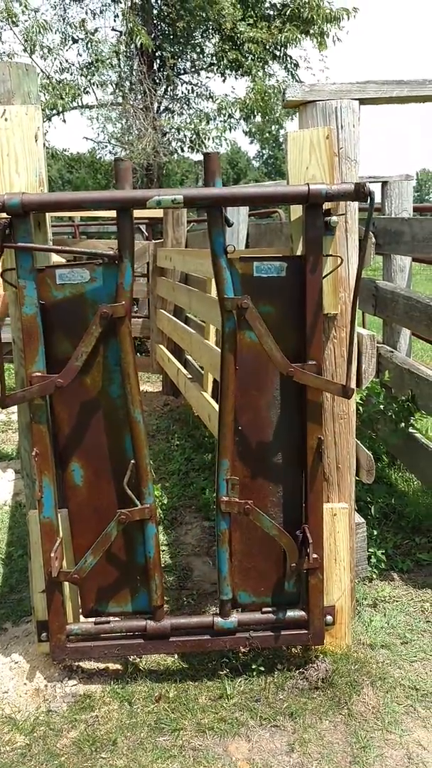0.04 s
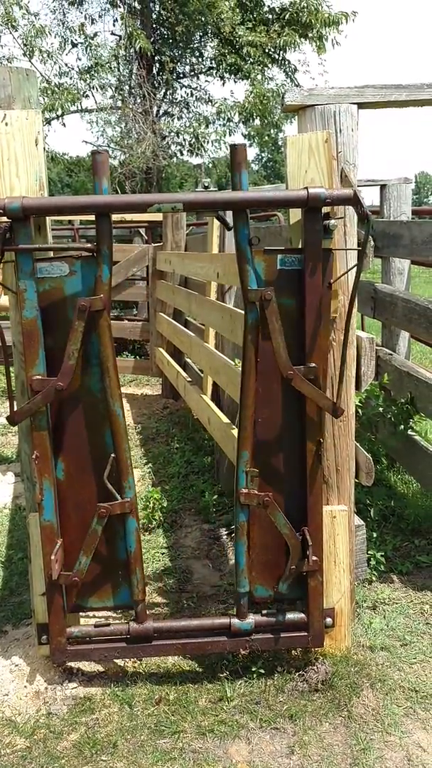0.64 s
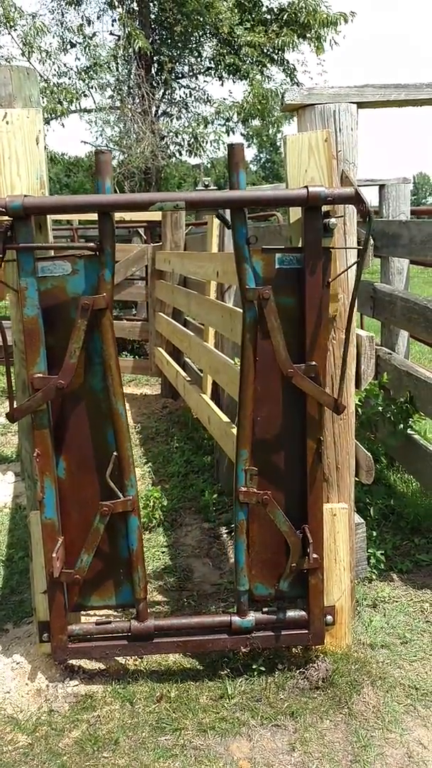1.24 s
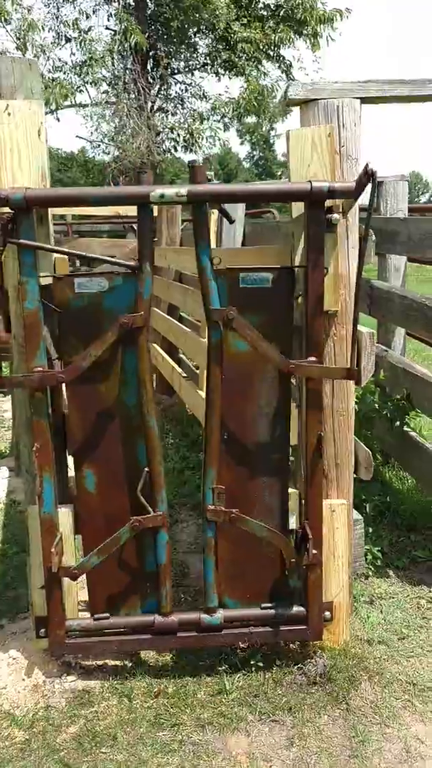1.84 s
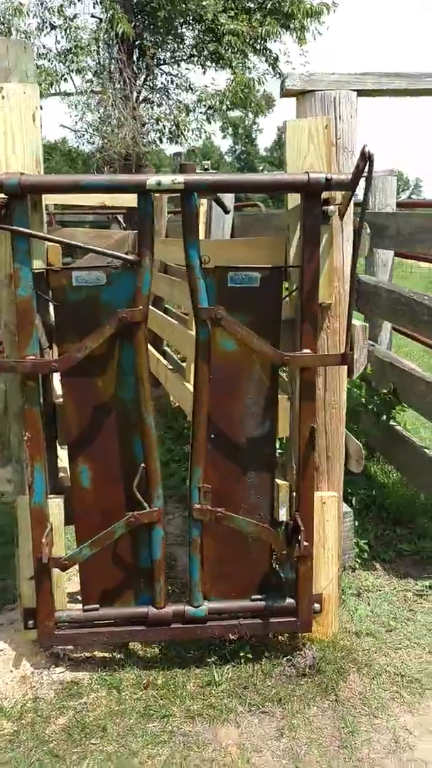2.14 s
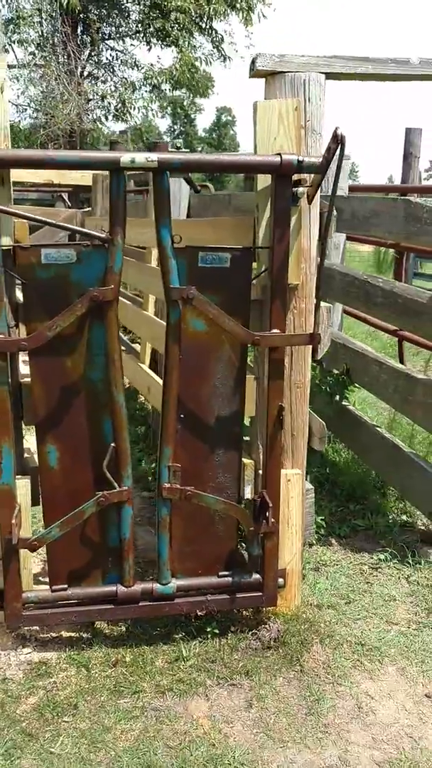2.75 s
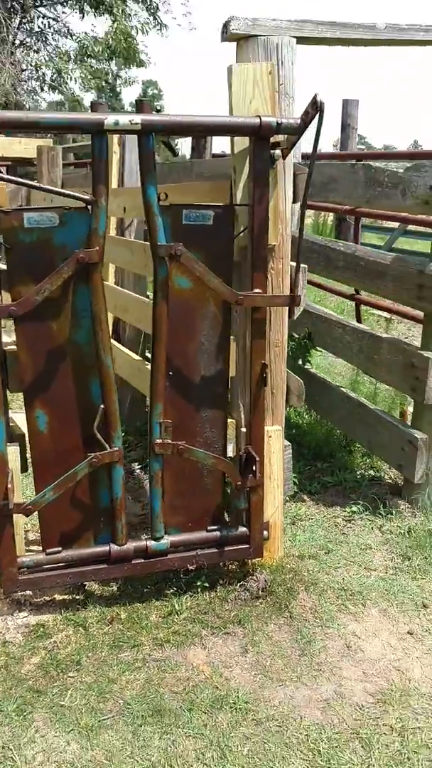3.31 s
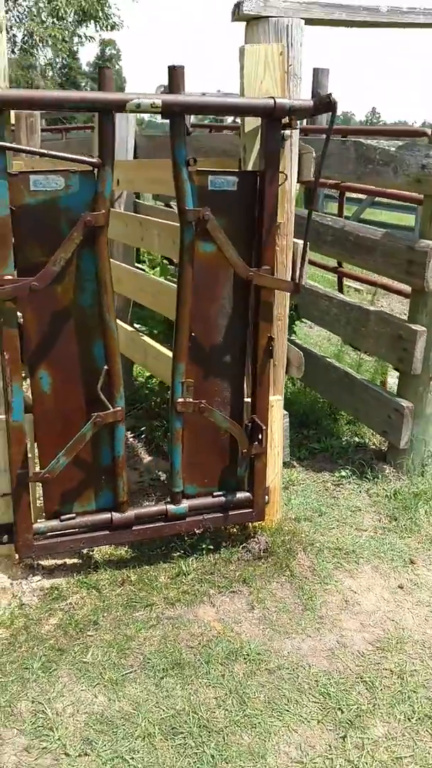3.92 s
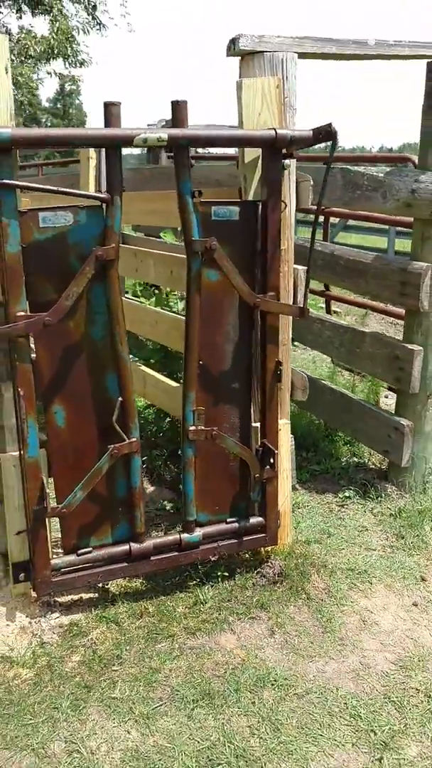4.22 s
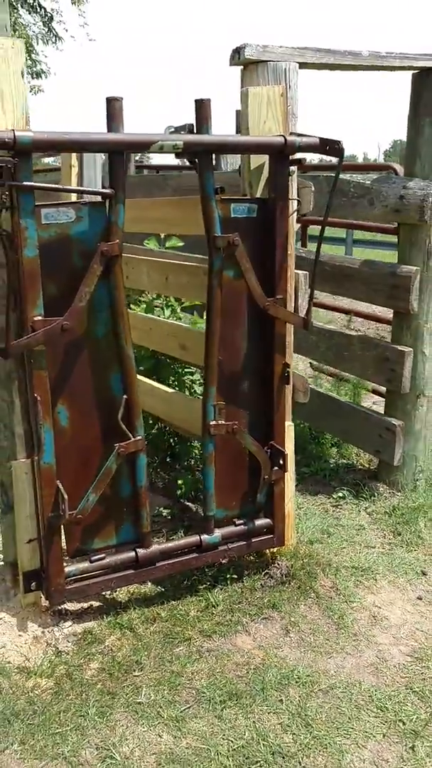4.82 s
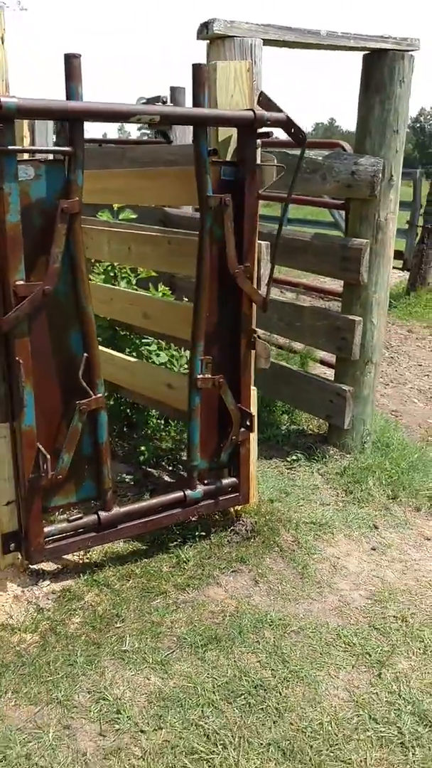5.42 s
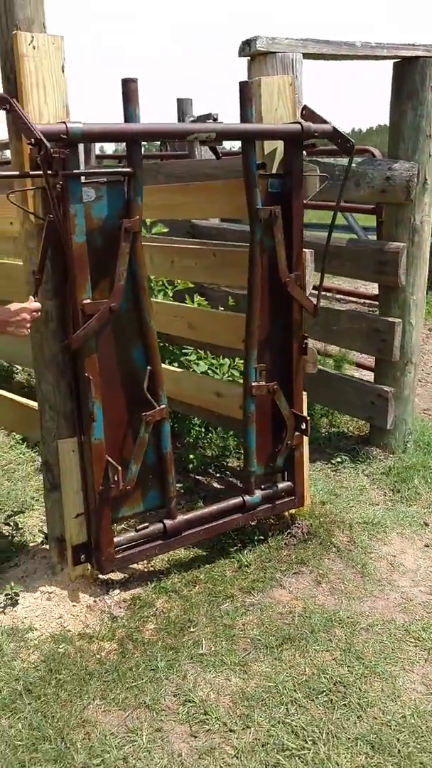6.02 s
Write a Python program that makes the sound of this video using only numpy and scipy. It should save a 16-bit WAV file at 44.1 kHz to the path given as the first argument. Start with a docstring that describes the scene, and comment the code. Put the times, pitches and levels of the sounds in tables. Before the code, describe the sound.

Metal gate panels shudder and scrape along a pipe while loose links clatter, with dull bumps and a short pivot squeal.

```python
"""Outdoors, a rusty steel head gate on a cattle chute is levered open and shut twice.
From the start its two panels shudder and scrape along a pipe, loose links clack, and the sheet steel
rings and groans. A faint whine follows, and someone begins shifting about in the grass. After the second
stroke come soft dull bumps; two more strokes clatter by, a dry pivot squeals at 4.3 s, and a last stroke
ends in clacks, groans and fading bumps. It is all heard through a stereo widener with a comb ripple."""
import sys
import numpy as np
from scipy import signal
from scipy.fft import rfft, irfft
from scipy.io import wavfile
from scipy.ndimage import uniform_filter1d

SR = 44100
rng = np.random.default_rng(int(sys.argv[2]) if len(sys.argv) > 2 else 0)


def file_out(sig):
    """Save sig as 16-bit WAV at sys.argv[1]."""
    # one column per channel
    cols = np.atleast_2d(sig).T
    # limit, then scale
    lim = np.clip(cols, -1, 1)
    pcm = np.round(lim * 32767).astype(np.int16)
    wavfile.write(sys.argv[1], SR, pcm)


N = 267246
T = np.arange(N) / SR


def amp(db):
    """Decibels to gain."""
    return 10 ** (np.asarray(db) / 20)


def unit(x):
    """Scales to rms 1."""
    return x / np.sqrt(np.mean(x ** 2) + 1e-20)


def read(points, hz):
    """Reads a table on a log-frequency axis."""
    f, value = np.transpose(points)
    return np.interp(np.log(hz + 1), np.log(f + 1), value)


def bins(x):
    """Frequencies of the spectrum of x."""
    return np.fft.rfftfreq(len(x), 1 / SR)


def colour(x, points):
    """Puts x through an EQ curve, at rms 1."""
    return unit(irfft(rfft(x) * amp(read(points, bins(x))), len(x)))


def drift(hz, size=N):
    """Random wobble of rms 1, up to about hz."""
    x = rng.standard_normal(size)
    return unit(irfft(rfft(x) * np.exp(-(bins(x) / hz) ** 2), size))


def add(mix, s, sound):
    """Mixes a sound in at s seconds."""
    part = mix[max(round(s * SR), 0):][:len(sound)]
    part += sound[:len(part)]


def away(peak, before, after):
    """Distance from a peak in time: 0 at the peak, 1 at the given spans before and after it."""
    return np.maximum((peak - T) / before, (T - peak) / after)


def tone(curve, partials, waver, shake_db):
    """A gliding, slightly rough tone from rows (s, Hz, dB) and partials (harmonic, dB)."""
    s, hz, db = np.transpose(curve)
    turns = np.cumsum(np.interp(T, s, hz) * (1 + waver * drift(61))) / SR
    level = amp(np.interp(T, s, db) + shake_db * drift(130)) * (T > s[0]) * (T < s[-1])
    wave = sum(amp(part_db) * np.sin(2 * np.pi * k * turns) for k, part_db in partials)
    return np.sqrt(2) * level * wave


# EQ of the outdoor bed. Each row: frequency in Hz, relative level in dB.
AIR_EQ = [(25,8),(100,0.5),(250,8.5),(600,-25),(1480,-19),(1620,10),(1800,-30),(3000,-39),(4200,-14),(7000,-40),(9500,-12.5),(12000,-38),(15000,-27)]
def outdoor_air(level_db=-55):
    """A soft bed of air that slowly swells and sinks."""
    return colour(rng.standard_normal(N), AIR_EQ) * amp(level_db + 3.9 * drift(1.8))


# Panel shudders. Each row: peak time, build-up and die-away in seconds, relative level in dB.
PANEL_SHUDDERS = [(0,.05,0.1,-33),(.34,0.23,0.21,-18.5),(.77,0.15,0.11,-39.5),(1.42,0.26,0.071,-20.5),(1.78,0.067,0.13,-25),(2.15,0.37,.36,-28),(3.178,0.09,0.11,-22.5),
                  (3.39,0.21,0.36,-26.5),(3.65,.2,0.28,-25.5),(4.09,0.26,0.052,-28),(4.27,0.067,0.26,-23.5),(5.32,0.3,0.066,-16.5),(5.78,0.5,0.24,-37.5)]
def shuddering(swing_db=20):
    """Envelope of panels binding or brought up short; each build-up and die-away spans swing_db."""
    return np.sqrt(sum(amp(db - swing_db * away(*swell)) ** 2 for *swell, db in PANEL_SHUDDERS))


# Lever strokes. Each row: time of top speed, speed-up and slow-down in seconds, relative level in dB.
LEVER_STROKES = [(.32,0.32,0.28,-18.5),(1.6,.5,0.44,-20.5),(3.61,0.34,0.099,-17.5),(4.3,0.16,0.34,-26.5),(5.37,0.58,0.13,-21)]
def sliding(speed_power=2.13):
    """Envelope of friction on the pipe: it follows the speed, one arch from rest to rest per stroke."""
    return sum(amp(db) * np.cos(np.pi / 2 * np.minimum(away(*arch), 1)) ** speed_power
               for *arch, db in LEVER_STROKES)


# EQ of rubbed steel. Each row: frequency in Hz, relative level in dB.
SCRAPE_EQ = [(40,-32),(100,-23.5),(165,1),(245,4),(340,-3),(550,3),(1050,1.5),(1700,-3.5),(3000,-6),(4200,-11),(5900,-15.5),(7200,-22.5),(12000,-28.5),(15000,-40.5)]
def scrape(level_db=-2, slips_per_s=900, spread_db=3.5, slip_ring_s=0.0064, hiss=0.83,
           judder_db=-0.94, judder_hz=60, crossover_hz=2800):
    """Rust catches and slips in tiny ringing jolts; sliding drives mostly grit, shuddering mostly body."""
    jolts = amp(spread_db * np.minimum(rng.exponential(1, N), 4)) * (rng.random(N) < slips_per_s / SR)
    # every spot of rust has its own short ring
    rings = rng.standard_normal((12, 1024)) * np.exp(-T[:1024] / slip_ring_s)
    spot = rng.integers(0, len(rings), N)
    slips = sum(signal.oaconvolve(jolts * (spot == k), ring)[:N] for k, ring in enumerate(rings))
    friction = unit(slips) + hiss * rng.standard_normal(N)
    rub = colour(friction * amp(judder_db * drift(judder_hz)), SCRAPE_EQ)
    treble = irfft(rfft(rub) / (1 + (crossover_hz / (bins(rub) + 1)) ** 4), N)
    slide, shudder = sliding(), shuddering()
    # both envelopes have a floor: the loose panels never quite keep still
    body = np.sqrt(shudder ** 2 + (amp(-10) * slide) ** 2 + amp(-56.5) ** 2)
    grit = np.sqrt(slide ** 2 + (amp(-12) * shudder) ** 2 + amp(-48.5) ** 2)
    return amp(level_db) * (body * (rub - treble) + grit * treble)


# Steel hits. Each row: start in seconds, strength in dB, hardness in dB, rattle time in seconds.
LINK_HITS = [(.057,-19,2.5,0.11),(.228,-31,-8.5,0.13),(.397,-23,-8,0.39),(0.444,-20.5,5,0.067),(.507,-24,-4.5,0.13),(.914,-25,-8.5,.14),(1.096,-27.5,-22.5,.1),
             (1.358,-30.5,18.5,0.14),(1.389,-23,-14,0.28),(1.436,-21.5,-4,0.15),(1.627,-25.5,-8,0.24),(1.68,-21.5,6.5,0.19),(1.723,-24.5,4,0.1),(1.741,-20,-1.5,0.79),
             (1.924,-22.5,2.5,0.22),(2.03,-24.5,-0.5,0.38),(2.051,-23,1,0.24),(2.086,-24,0,0.36),(2.154,-26.5,4,0.26),(2.187,-27.5,-2.5,0.37),
             (3.176,-21,9,0.24),(3.29,-31,-13.5,0.25),(3.346,-28,-12,0.076),(3.48,-26,-8,0.077),(3.501,-24,7.5,0.35),(3.552,-21.5,2.5,0.32),(3.635,-16.5,2.5,0.37),(3.709,-23.5,12.5,0.17),
             (3.803,-26.5,0.5,0.18),(3.925,-36,8,0.21),(3.941,-20.5,-1.5,0.094),(4.02,-23.5,-2,0.14),(4.214,-25.5,-8,0.07),(4.233,-19,6.5,0.22),(4.329,-22.5,13,0.074),
             (4.883,-21,-1,0.15),(4.992,-48,27.5,0.21),(5.027,-29.5,-21,0.15),(5.033,-21,10,0.12),(5.337,-18,1,0.42),(5.409,-18.5,9,0.13),(5.484,-37,-12,0.091),(5.565,-39.5,-7.5,0.38),(5.648,-28,-5,0.17)]
# EQ of struck steel. Each row: frequency in Hz, relative level in dB.
HIT_EQ = [(40,-48),(100,-18),(170,-7),(245,3),(340,-8),(550,1.5),(1000,5.5),(1700,5),(2450,2),(3000,-13),(4200,-14.5),(7000,-34),(12000,-47.5),(15000,-67)]
# A hit's four bands: thud, clang, clink, tick. Each row: trim in dB, dB gained per dB of hardness.
HIT_BANDS = [(-5.5,-0.5345),(-1,0),(-5,0.5277),(-26.5,1.0)]
# The three crossovers between those bands, in Hz.
HIT_CROSSOVERS = [850, 2800, 7500]
def knocks(level_db=3, chatter_db=0.5, rise_s=0.0012, damping=0.098, crack=0.16, crack_s=0.0034):
    """Loose links clack in chattering bursts; hard hits favour the highs, which crack and die first."""
    out, t = np.zeros(N), T[:16384]
    hz = bins(t)
    band = np.searchsorted(HIT_CROSSOVERS, hz)
    for s, strength_db, hardness_db, rattle_s in LINK_HITS:
        spectrum = rfft(rng.standard_normal(len(t))) * amp(read(HIT_EQ, hz))
        chatter = amp(chatter_db * drift(430, size=len(t)))
        for k, (trim_db, slope) in enumerate(HIT_BANDS):
            attack = (1 - np.exp(-t * (1 + k) ** 2 / rise_s)) * (1 + crack * k * np.exp(-t / crack_s))
            fall = amp(-60 * t * (1 + damping * k) / rattle_s)
            burst = unit(irfft(spectrum * (band == k)) * chatter * attack * fall) * np.std(fall)
            add(out, s, amp(strength_db + trim_db + slope * hardness_db + level_db) * burst)
    return out


def moving_contact(force, patchy_db=3):
    """The point of contact moves, favouring now one cluster of resonances and now another."""
    hz, _, frames = signal.stft(force, SR, nperseg=512, noverlap=384)
    slow_noise = uniform_filter1d(rng.standard_normal(frames.shape), size=16, axis=1)
    patches = unit(uniform_filter1d(slow_noise, size=2, axis=0))
    depth_db = patchy_db * np.minimum(hz / 1500, 1)[:, None]  # short waves feel the move most
    shifting = signal.istft(frames * amp(depth_db * patches), SR, nperseg=512, noverlap=384)[1][:N]
    return np.std(force) * unit(shifting)


# Tail of the dense wash of weak modes. Each row: frequency in Hz, 60 dB decay in seconds.
WASH_DECAY = [(100,0.97),(260,0.44),(700,0.37),(1800,0.27),(4800,0.17),(12000,0.22)]
# Clear modes of panels and frame. Each row: pitch in Hz, relative weight in dB, 60 dB decay in seconds.
STEEL_MODES = [(252,-22,0.2),(432,-5.5,3.8),(461,-11.5,2.4),(515,-1,0.37),(544.7,0,0.31),(583.5,1,0.28),(660.5,-0.5,0.24),(718,0,1.18),(797,-9,2.5),(924,-12,1.4),(1004,-2,0.5),(1049,-1,0.63),(1145,-12.5,2.8),(1258,-12.5,1.8),(1317,-0.5,0.8),(1404,-5.5,1.2),(1610,-7,2.65),(1675,0.5,0.33),(1750,-6,0.5),(2140,1,0.5),(2340,6,0.27),(3090,1,0.62),(3550,0,0.44),(4150,1,0.28)]
def steel_ring(force, wash_db=-8, modes_db=-9):
    """The sheet steel answers at once, then rings on with a wash of weak modes and some clear ones."""
    t = T[:2 * SR]
    hz, times, frames = signal.stft(rng.standard_normal(len(t)), SR, nperseg=256)
    decay = amp(-60 * times / read(WASH_DECAY, hz)[:, None])
    wash = signal.istft(frames * decay, SR, nperseg=256)[1][:len(t)]
    clear = sum(amp(db - 60 * t / t60) / np.sqrt(t60) * np.cos(2 * np.pi * f * t)
                for f, db, t60 in STEEL_MODES)
    wash_ring = amp(wash_db) * unit(signal.fftconvolve(force, wash)[:N])
    clear_ring = amp(modes_db) * unit(signal.fftconvolve(force, clear)[:N])
    return force + np.std(force) * (wash_ring + clear_ring)


# Groans and chirps. Each row: start, attack, hold and 60 dB release in seconds, pitch in Hz,
# level in dB, pitch wobble in Hz.
FRICTION_NOTES = [(.22,0.12,0.077,0.18,545,-23,7.5),(0.505,0.0036,0.0071,0.19,1074,-20.5,22),(1.677,0.0059,0.0094,0.057,5870,-21.5,170),(3.495,0.0065,0.042,.1,4520,-27,130),(3.975,0.012,0.021,0.11,1072,-29.5,44),(4.236,0.0049,0.018,0.089,4480,-25,56),(4.882,0.0016,0.014,0.17,587,-24.5,6.3),(5.263,0.053,0.053,0.29,678,-18,27.4)]
def groans(shake_db=3.5):
    """Stick and slip locks on to one resonance, which swells, wavers and dies."""
    out, t = np.zeros(N), T[:32768]
    for s, attack, hold, t60, hz, db, wobble_hz in FRICTION_NOTES:
        level = np.minimum(t / attack, 1) * amp(db - 60 * np.maximum(t - attack - hold, 0) / t60)
        turns = np.cumsum(hz + wobble_hz * drift(51, size=len(t))) / SR
        shake = amp(shake_db * drift(59, size=len(t)))
        add(out, s, level * shake * np.sin(2 * np.pi * turns))
    return out


# Glide of the whine. Each row: time in seconds, unsounded fundamental in Hz, relative level in dB.
WHINE_GLIDE = [(.6,296,-84.5),(.69,310,-57),(.74,323,-43),(.81,333,-56),(1.0,333,-47),(1.05,327,-53),(1.1,314,-43)]
def whine():
    """A faint, thin whine of two upper harmonics while the panels stand open."""
    return tone(WHINE_GLIDE, [(5, -4), (6, -3)], waver=0.002, shake_db=1.0)


# Foot moves. Each row: peak time in seconds, half length in seconds, level in dB.
FOOT_MOVES = [(0.852,0.034,-40.5),(1.187,0.16,-45),(2.531,0.079,-47.5),(2.88,0.91,-50),(4.519,0.13,-44.5),(4.83,0.12,-50.5)]
# EQ of the swish. Each row: frequency in Hz, relative level in dB.
GRASS_EQ = [(300,5),(2000,16),(4000,10),(9000,1.5),(15000,-5.5)]
def footsteps(crackle_db=2.0):
    """Grass swishes underfoot in smooth swells of crackly noise."""
    tread = sum(amp(db) * np.exp(-((T - s) / half) ** 2) for s, half, db in FOOT_MOVES)
    return tread * colour(rng.standard_normal(N) * amp(crackle_db * drift(500)), GRASS_EQ)


# Bump cues. Each row: start in seconds, relative level in dB.
BUMP_CUES = [(2.423,-25.5),(2.484,-28),(2.757,-31.5),(2.821,-32),(2.862,-37.5),(2.942,-35.5),(3.086,-27.5),(4.639,-37),(4.689,-30),(5.844,-29.5),(5.952,-38.5),(6.03,-47)]
# EQ of a bump. Each row: frequency in Hz, relative level in dB.
BUMP_EQ = [(50,-26),(130,-2),(340,-1.5),(600,-11),(1400,-13.5),(2500,-21),(8000,-51)]
def bumps(level_db=-3, rise_s=0.0017, t60=0.087):
    """Short dull bumps with no ring."""
    out, t = np.zeros(N), T[:8192]
    for s, db in BUMP_CUES:
        envelope = amp(db + level_db - 60 * t / t60) * (1 - np.exp(-t / rise_s))
        add(out, s, envelope * colour(rng.standard_normal(len(t)), BUMP_EQ))
    return out


# Glide of the squeal. Each row: time in seconds, pitch in Hz, relative level in dB.
SQUEAL_GLIDE = [(4.33,1650,-32),(4.385,1628,-40),(4.405,1622,-24),(4.425,1617,-22),(4.455,1617,-24),(4.5,1621,-32),(4.555,1622,-37.5),(4.62,1634,-58),(4.7,1630,-104)]
def pivot_squeal():
    """A dry pivot sings one clear note with a faint octave on top."""
    return tone(SQUEAL_GLIDE, [(1, 3), (2, -19)], waver=0.0035, shake_db=0.6)


# Stereo width before the ripple. Each row: frequency in Hz, side over mid in dB.
STEREO_WIDTH = [(30,22),(60,10.5),(125,-2.5),(250,0),(500,-8.5),(720,-5.5),(1000,-18.5),(2000,-2.5),(4000,0.5),(15000,-2.5)]
# Comb ripple of the stereo widener. Each row: frequency in Hz, depth in dB.
WIDTH_RIPPLE = [(600,-2.5),(1200,-0.5),(2600,18.5),(4000,20.5),(5300,11),(9000,14),(14000,4)]
# Side signal straight from the gate. Each row: frequency in Hz, share from 0 to 1.
DIRECT_SHARE = [(40,0.1),(700,0.98),(2000,1),(3200,0.75),(5000,1),(9000,0.45),(14000,0.5)]
# Balance. Each row: frequency in Hz, left boost and equal right cut in dB.
BALANCE = [(60,0),(200,1),(600,0),(2400,-1.2),(4000,-0.5),(8000,1.05),(14000,0.5)]
def stereo_widener(x, ripple_hz=2620, scatter_s=0.0123):
    """Comb ripple of a stereo widener: mid and side take turns up the spectrum."""
    hz, spectrum = bins(x), rfft(x)
    angle = 2 * np.pi * hz / ripple_hz
    width = amp(read(STEREO_WIDTH, hz) + read(WIDTH_RIPPLE, hz) * np.cos(angle))
    # scatter off the fences loosens the side
    scatter = rfft(rng.standard_normal(N) * T * np.exp(-T / scatter_s))
    direct = read(DIRECT_SHARE, hz)
    # the direct side is a quarter turn from the mid, and flips at each peak and trough of the ripple
    turn = -1j * direct * np.tanh(4 * np.sin(angle)) + np.sqrt(1 - direct ** 2) * scatter / abs(scatter)
    # where the side carries nearly all the sound, left and right are simply opposed
    opposed = np.clip(np.cos(angle), 0, 1) ** 2 * (hz > ripple_hz / 2)
    turn = np.sqrt(1 - opposed) * turn + 1j * np.sqrt(opposed)
    mid = spectrum / np.sqrt(1 + width ** 2)
    side = mid * width * turn
    lean_db = read(BALANCE, hz)
    return np.array([irfft((mid + side) * amp(lean_db), N), irfft((mid - side) * amp(-lean_db), N)])


def scene():
    """Knocks and scrapes set the steel ringing; the other layers join it ahead of the widener."""
    gate = steel_ring(moving_contact(knocks() + scrape()))
    squeaks = groans() + pivot_squeal() + whine()
    return stereo_widener(gate + squeaks + bumps() + outdoor_air() + footsteps())


def record(dry, cutoff_hz=15500):
    """A steep low-pass takes off the very top."""
    lowpass = signal.firwin(511, cutoff_hz, window=("kaiser", 9), fs=SR)
    return signal.oaconvolve(dry, lowpass[None], "same", axes=1)


dry = scene()
out = record(dry)
file_out(out)
```